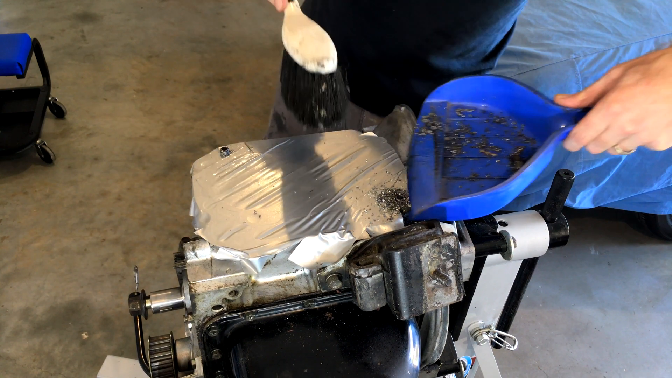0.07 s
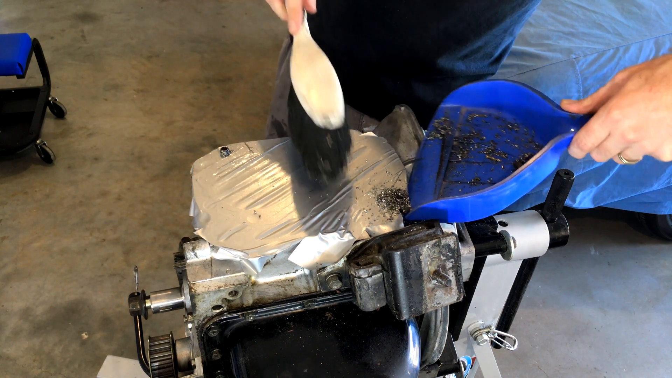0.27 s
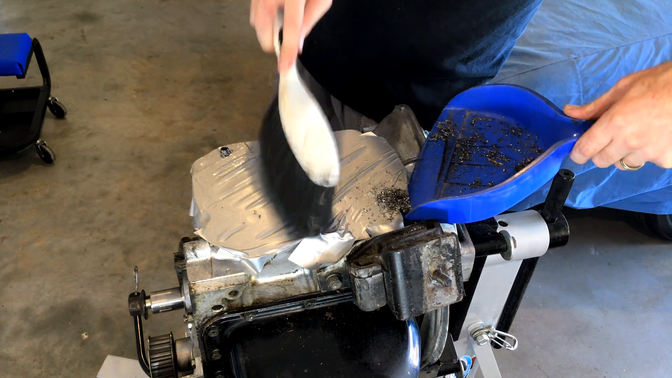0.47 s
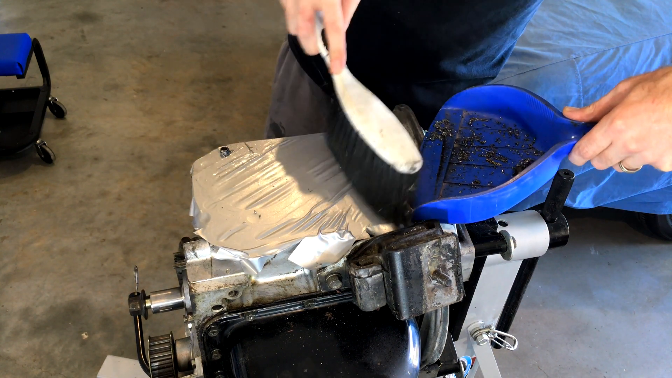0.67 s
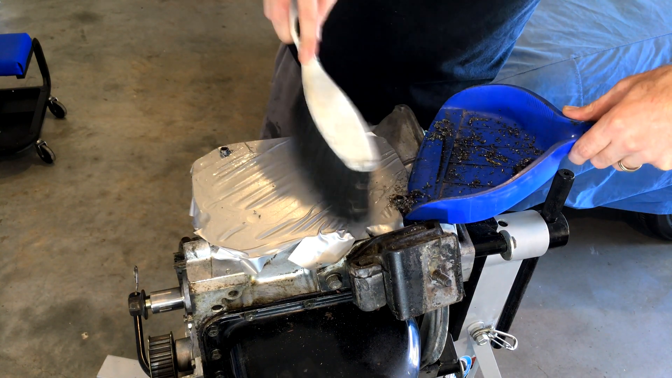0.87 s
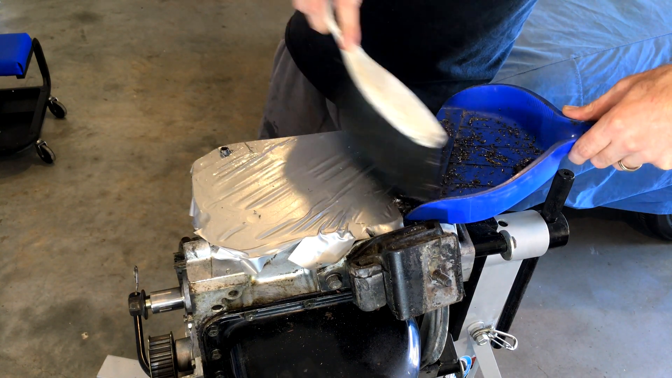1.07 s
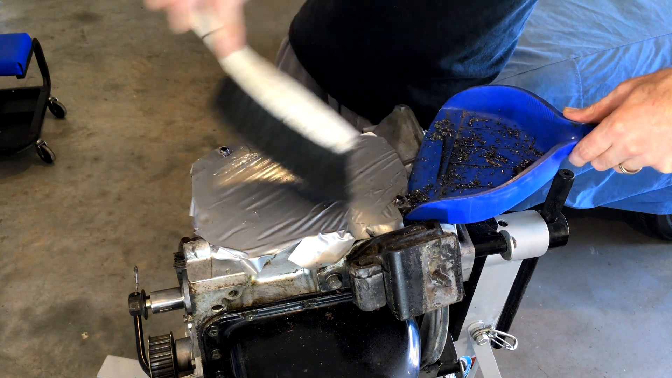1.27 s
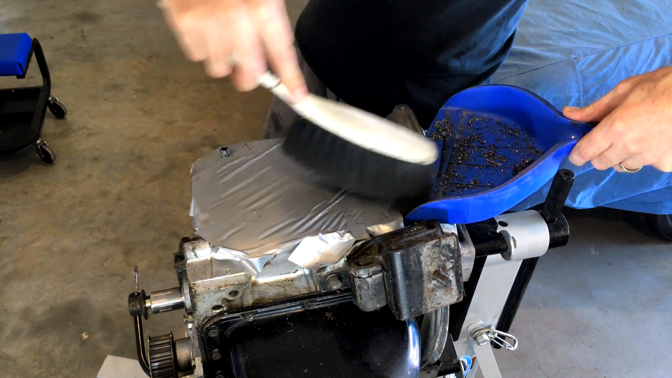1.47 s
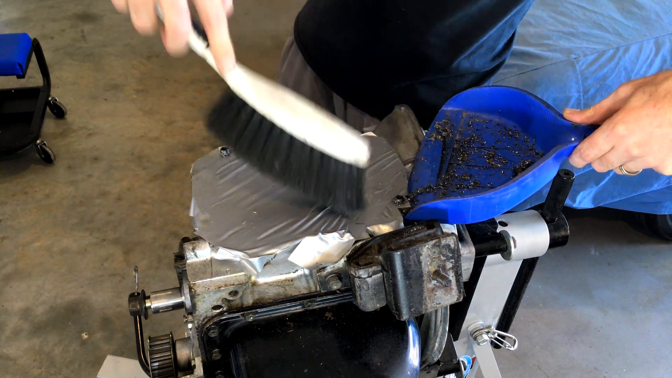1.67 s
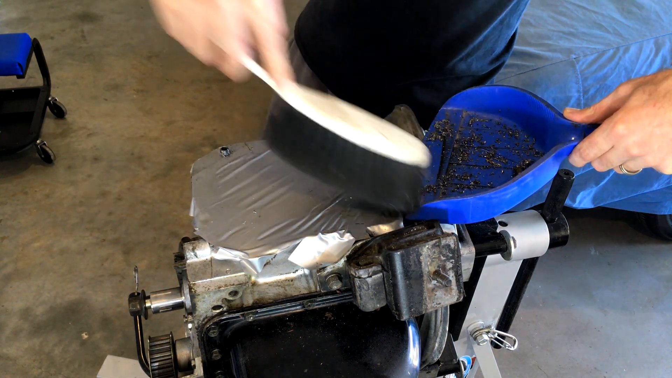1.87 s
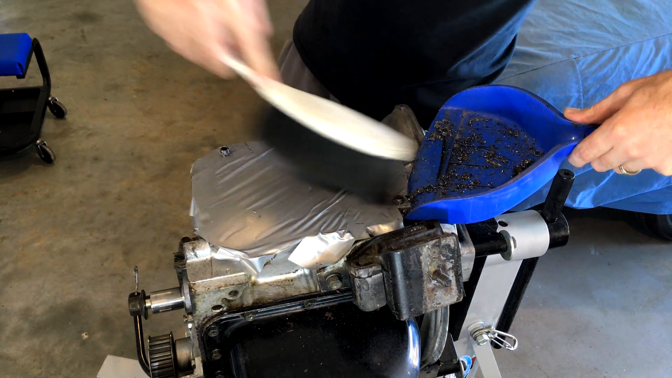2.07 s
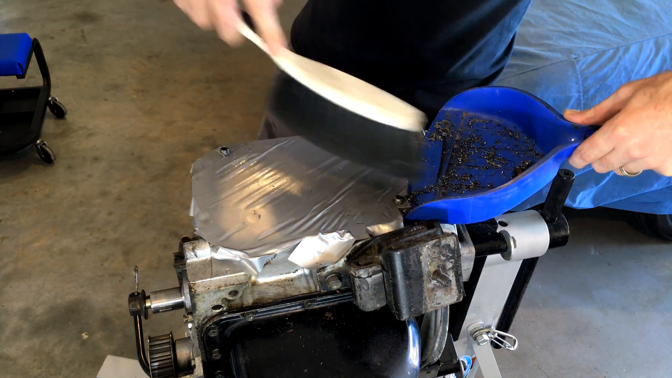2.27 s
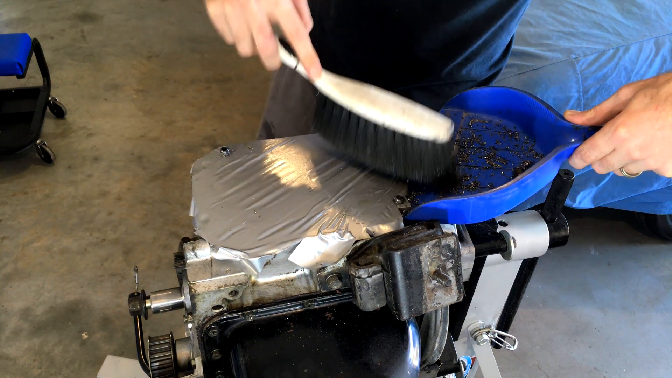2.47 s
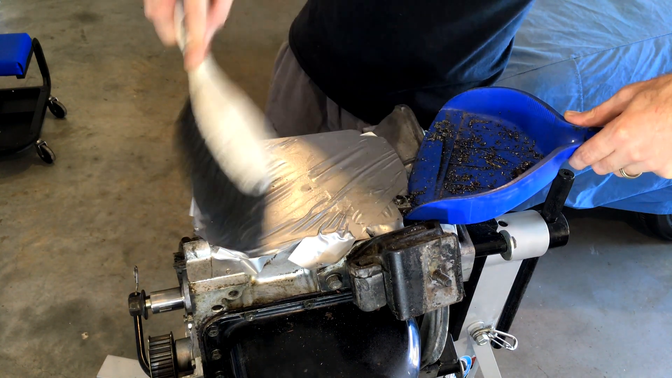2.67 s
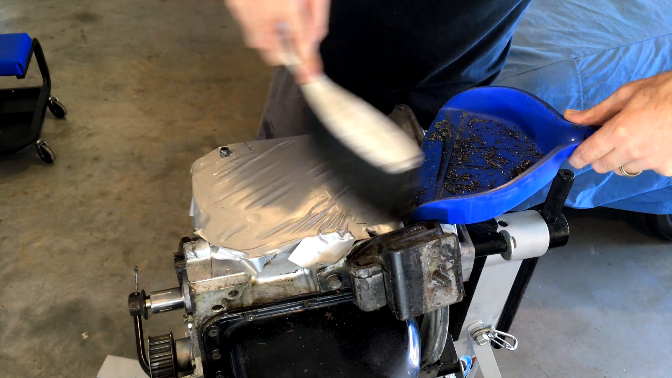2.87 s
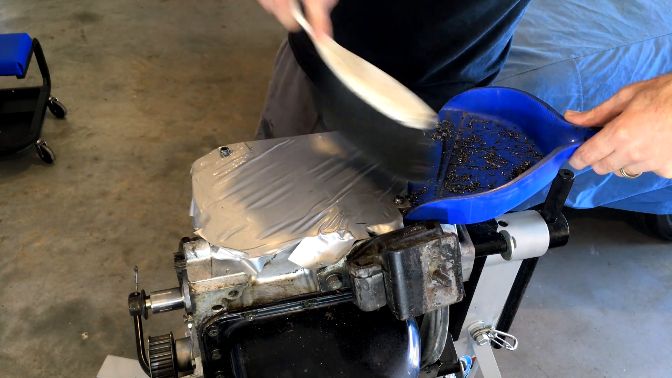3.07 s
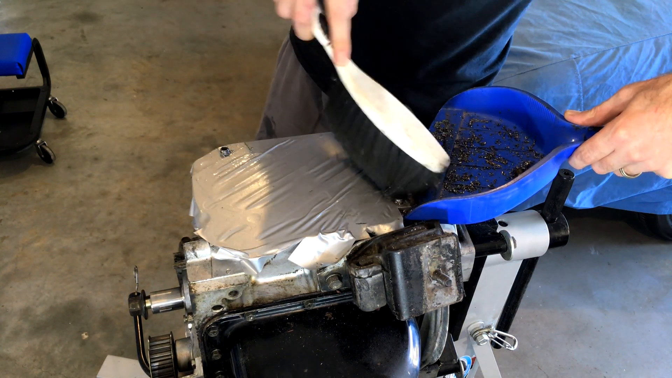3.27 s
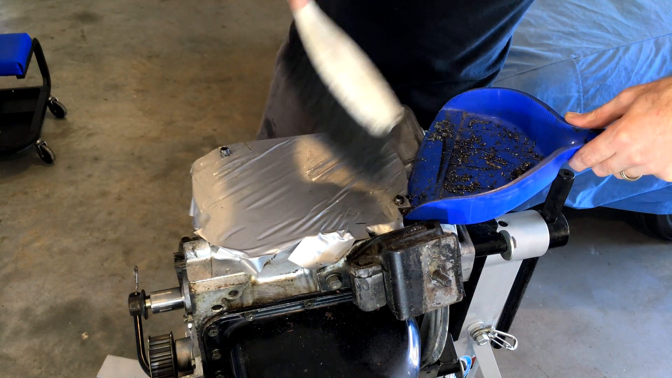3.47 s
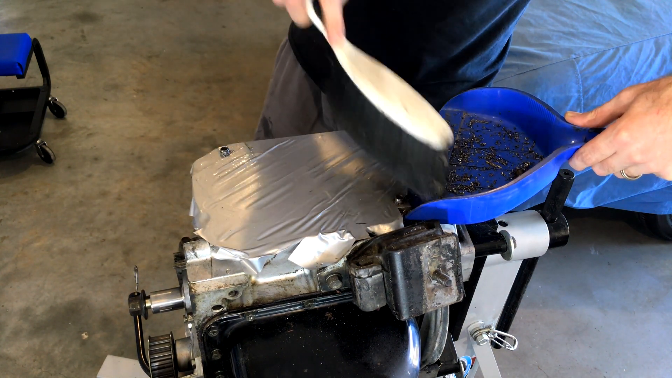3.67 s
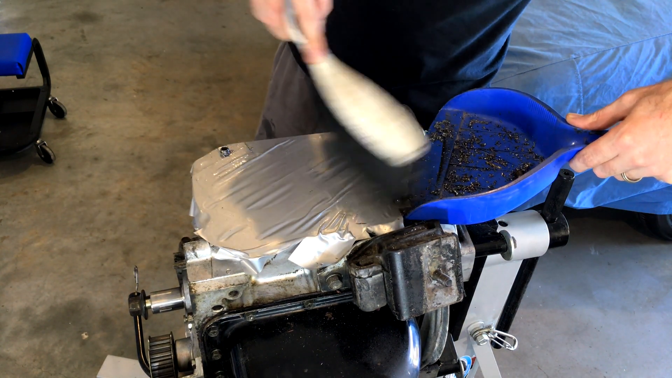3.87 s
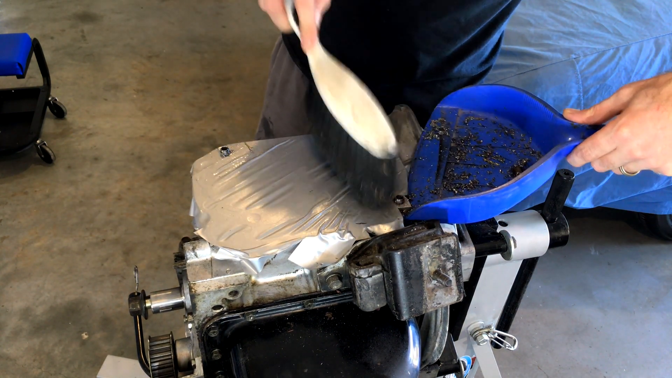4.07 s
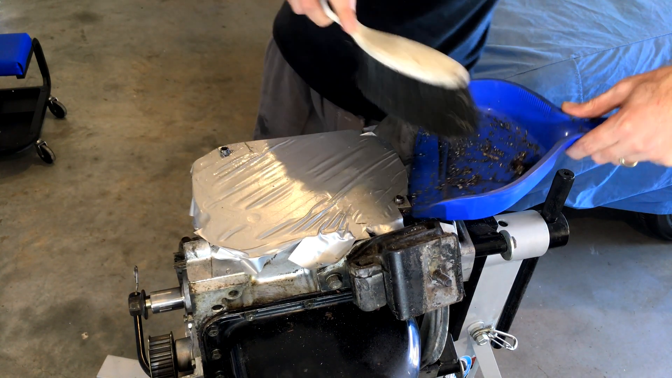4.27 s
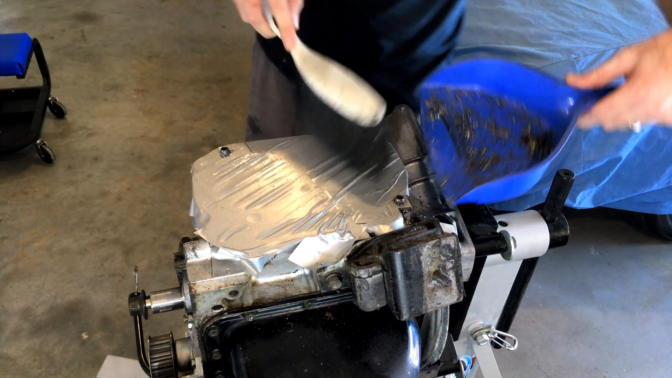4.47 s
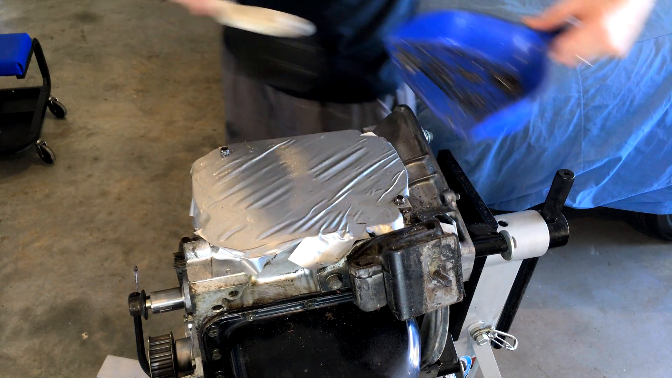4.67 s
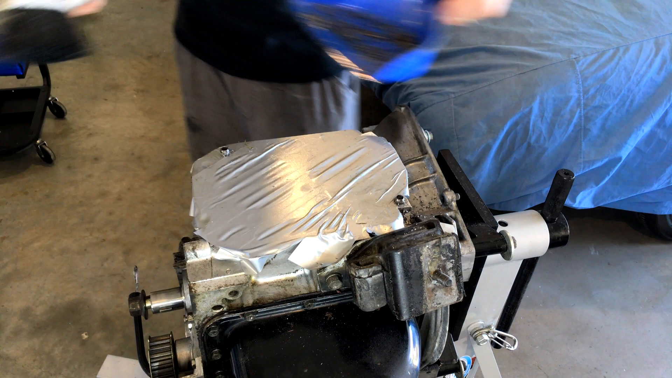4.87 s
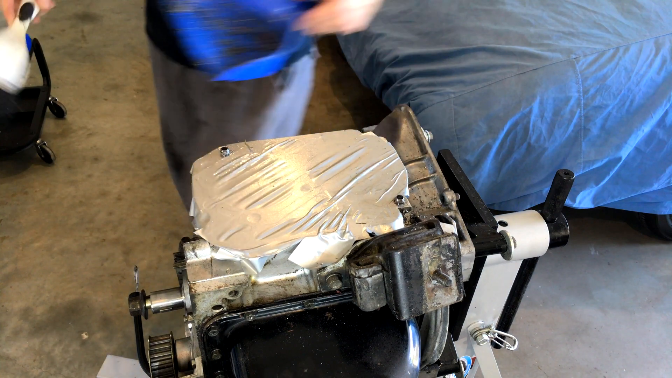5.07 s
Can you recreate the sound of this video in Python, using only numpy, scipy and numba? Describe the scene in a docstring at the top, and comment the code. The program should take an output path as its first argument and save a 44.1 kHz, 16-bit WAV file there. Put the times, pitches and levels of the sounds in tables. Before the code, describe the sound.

A close mono pickup in a garage with faint low air hum and a short, dull room tail. From 0 to 0.4 s a plastic dustpan is pushed into place: uneven dull rubbing, low knocks and two small hollow bumps near 0.1 and 0.17 s. The first brush stroke starts at 0.5 s, followed by others at roughly 0.75, 0.9, 1.3, 1.7, 2.05, 2.4, 2.7, 3.2, 3.55, 3.85, 3.95, 4.1 and 4.45 s. Most land with a soft boxy thud on the hollow taped cover, crackle at once, then rasp dry and scratchy with airy bristle hiss for 0.1 to 0.2 s, thinning to loose grit. Bright tiny metal ticks scatter throughout, stronger near 1.0 and 2.1 s, sharpest at 3.95 s. After 4.5 s brushing stops; quiet rubbing and sliding shavings follow as the pan leaves, with a soft scuff and bump around 5 s.

```python
"""A hand brush sweeps metal shavings off a taped-over engine part into a plastic dustpan in a garage.
Its bristles stick and slip: random clicks, filtered as scratch and tip hiss, also drive the hollow cover's modes.
Landings are soft pushes on those modes; shavings tick as short noise bursts, the pan rubs (coloured clicks)
and knocks dully (fading sines). A small room answers with a noise tail, over a faint hum of air."""
import sys
import numpy as np
from scipy import signal
from scipy.fft import rfft, irfft
from scipy.io import wavfile
from scipy.ndimage import uniform_filter1d
from numba import njit

SR = 44100
rng = np.random.default_rng(int(sys.argv[2]) if len(sys.argv) > 2 else 0)


def wav_out(sig):
    """Save sig, one row per channel (or a flat mono array), as 16-bit PCM at SR to the path in sys.argv[1]."""
    wavfile.write(sys.argv[1], SR, np.round(np.clip(np.atleast_2d(sig).T, -1, 1) * 32767).astype(np.int16))


def gain_from_db(level_db):
    """Turn a decibel level (scalar or array-like) into a linear amplitude factor."""
    decades = np.asarray(level_db, float) / 20
    return 10 ** decades


N = 226268

# garage air and microphone hiss: hz, gain_db
AIR_CURVE = [(12, -67), (20, 6.5), (56, 4.5), (204, -3.5), (388, -8.5), (472, -11.5), (678, -15.5),
             (780, -9.5), (976, -15.5), (1570, -14.5), (2530, -23), (5380, -22), (7110, -24), (14700, -25),
             (16000, -35)]
# pan brought to the edge, carried off, scuffed; per move, points of: start_s, rub_level_db, slide_against_rub_db
PAN_MOVES = [
    [(0, -45, -17.5), (.036, -46, -11), (.114, -46.5, -14.5), (.19, -55, -8), (.27, -59, -9),
     (.47, -70.5, -3.5)],
    [(4.5, -63, -10), (4.55, -63, -12), (4.63, -60.5, -9), (4.71, -60, -4.5), (4.8, -66, -1.5),
     (4.855, -68, 13.5), (4.91, -67, 2.5), (4.95, -77, 0), (5.13, -79, 2)],
    [(4.945, -81, -12), (4.96, -56.5, -10), (5.01, -56, -14), (5.044, -67, -15), (5.07, -64, -9),
     (5.1, -80, -5)],
]
# pan and sleeve rub, first move then the later two: hz, gain_db
RUB_CURVES = [
    [(35, -31), (60, -7), (162, 0.5), (226, -6), (335, 1.5), (512, -11), (822, -7), (1590, -10.5),
     (1870, -19.5), (2220, -8), (2600, -19), (3380, -37), (5720, -120)],
    [(35, -42), (60, -17), (81, -4), (404, -1), (496, -2.5), (639, -5.5), (784, -2.5), (1380, -8.5),
     (2600, -19), (3380, -42), (5720, -120)],
]
# shavings sliding, first move then the later two: hz, gain_db
SLIDE_CURVES = [
    [(1530, -30), (2600, -22), (2940, -0.5), (3190, -6), (4040, -7.5), (5870, -3), (10500, -16.5),
     (14400, -8), (16000, -23)],
    [(1530, -7.5), (2600, -3.5), (3630, -0.5), (4200, -4), (5440, 0.5), (6470, -15), (7090, -14),
     (10900, -16), (16000, -24)],
]
# region each move's rub favours: pitch_hz, lift_db
RUB_FOCUS = [(800, 6), (480, 0), (800, 16)]
# dull knocks of pan and stand: start_s, peak_db, pitch_hz, t60_s
PAN_KNOCKS = [(0.004, -44, 167, 0.058), (0.099, -37.5, 156, 0.051), (0.17, -51, 95.5, 0.11),
              (0.496, -39.5, 72, 0.016), (0.596, -50, 65.7, 0.048), (0.659, -47, 244, 0.023),
              (3.971, -45.5, 104, 0.094), (4.018, -49, 148, 0.13), (4.206, -49, 124, 0.048),
              (4.454, -40.5, 95, 0.035), (4.899, -56, 61.9, 0.06)]
# shavings striking cover or pan: start_s, peak_db, ring_hz, clack_against_ring_db, edge_against_ring_db
CHIP_TICKS = [(0.7485, -40, 4670, -16, -15), (0.772, -44, 4600, -10, -8), (0.7956, -37, 4050, -3, -16),
              (0.828, -42, 4400, -8, -4), (0.8652, -39.5, 5060, -26, -24), (0.9963, -31, 3840, -4, -4),
              (1.127, -53, 4100, -6, -20), (1.2806, -50, 5180, -19, 3), (1.3034, -49, 5470, -15, -7),
              (1.5758, -46.5, 4210, -19, 2), (1.614, -48, 3230, -1, -15), (2.1216, -30, 4030, -18, -22),
              (2.2052, -40, 3600, -3, -16), (2.259, -41.5, 3230, 4, 0), (2.461, -40.5, 3950, -17, -22),
              (2.54, -41.5, 4600, 8, -21), (2.577, -47.5, 3670, -2, -8), (2.614, -46, 2900, 2, -2),
              (2.655, -41, 4130, 1.5, -2), (3.173, -42, 3240, -8, -14), (3.4056, -37, 4540, -2, 3.5),
              (3.4506, -42.5, 3830, 10, -15), (3.9491, -23, 4270, -2.5, -2), (3.96, -52, 5460, -25, -10),
              (3.9777, -28, 5060, -2.5, -18), (3.9874, -49, 5480, -20, -16),  (4.2064, -43, 4400, 9, -25),
              (4.359, -42.5, 2700, 31, -29), (4.7127, -49, 4590, 5, -22), (4.757, -45, 4670, -22, -26),
              (5.004, -45, 5200, -11, -20), (5.017, -49, 4470, 4, -24)]
# modes of the hollow taped cover: pitch_hz, relative_level_db, t60_s
COVER_MODES = [(271, -33, 0.048), (339, -3, 0.24), (413, -8.5, 0.041), (489.7, -4.5, 0.11), (528, -7, 0.08),
               (622, -2.5, 0.027), (689, 0, 0.018), (809, 2.5, 0.033), (930, -1, 0.028), (1174, -3, 0.014),
               (1340, -6, 0.023), (1491, -2, 0.0085), (1584, -2, 0.0095), (1830, -17.5, 0.011),
               (2060, -11.5, 0.066), (2220, -18.5, 0.23), (2400, -19, 0.033)]
# brush or pan lip bumping the cover: start_s, peak_db, favoured_hz, push_ms
COVER_LANDINGS = [(0.097, -36, 813, 0.36), (0.17, -33.5, 1020, 0.12), (0.492, -52, 633, 0.61),
                  (0.881, -28.5, 650, 0.3), (0.936, -34, 610, 0.78), (1.332, -38, 673, 1),
                  (1.471, -61, 622, 0.66), (1.74, -33.5, 630, 1), (2.048, -33, 845, 0.65),
                  (2.073, -50, 608, 0.68), (2.369, -42, 608, 1), (2.72, -35, 640, 0.45),
                  (2.854, -48, 724, 0.83), (3.193, -34.5, 630, 0.47), (3.22, -41.5, 490, 0.29),
                  (3.552, -44, 630, 0.39), (3.844, -31.5, 1000, 0.35), (4.108, -29.5, 590, 0.82),
                  (4.454, -27.5, 720, 0.47), (4.96, -57, 797, 0.27), (5.003, -44, 780, 0.56)]
# brush from each landing until its last chips settle; per stroke, points of:
# start_s, sweep_level_db, weight_against_sweep_db
BRUSH_STROKES = [
    [(.494, -45, 16), (.512, -54.5, 9), (.575, -51, 2), (.666, -51, 8.5), (.708, -58.5, 6),
     (.738, -59, -14)],
    [(.748, -48, -21), (.813, -62.5, 6.5), (.866, -56, -24)],
    [(.884, -50, 21), (.9, -58, 12.5), (.922, -52.5, 5), (.964, -54, 14.5), (.99, -56, -2),
     (1.062, -63.5, -4), (1.222, -80.5, 9), (1.31, -65.5, 12.5)],
    [(1.334, -47, 4), (1.355, -54, 7), (1.4, -51, 10), (1.453, -50, 10), (1.489, -57, 19),
     (1.51, -60.5, -6), (1.69, -79, 5)],
    [(1.71, -47, -6), (1.74, -53.5, 2), (1.782, -53.5, -8), (1.834, -68, 18.5), (1.864, -59, 2),
     (1.952, -87, -11), (2.03, -93, 0)],
    [(2.049, -50.5, 10), (2.093, -50.5, 14.5), (2.143, -48.5, -8.5), (2.221, -66, 3), (2.291, -69, -2),
     (2.35, -85, -2)],
    [(2.37, -43.5, 5), (2.385, -53, 16), (2.415, -48, -0.5), (2.46, -58, -2), (2.522, -69.5, -2),
     (2.66, -71, 3), (2.70, -93, 12)],
    [(2.72, -42.5, 9), (2.745, -49, 0), (2.817, -44.5, -1), (2.869, -49.5, 2.5), (2.935, -50.5, 4.5),
     (3.033, -89, -13), (3.16, -78.5, 14)],
    [(3.19, -52, 12.5), (3.233, -50, 9.5), (3.252, -48, -30), (3.319, -63.5, -2), (3.385, -67.5, -15),
     (3.402, -63, -2.5), (3.53, -79, -18)],
    [(3.553, -56, 11), (3.57, -55.5, 10.5), (3.607, -52, -9.5), (3.665, -67.5, 2), (3.795, -99, -14)],
    [(3.846, -46.5, 5.5), (3.856, -55, 16), (3.881, -54, 3.5), (3.938, -74.5, 1)],
    [(3.951, -49, -13), (4.011, -65.5, 8.5), (4.037, -67.5, 2), (4.05, -80, -4), (4.09, -90, 3)],
    [(4.105, -50, 9), (4.135, -54.5, 9), (4.181, -75.5, -3), (4.213, -68, 11.5), (4.251, -98, 12),
     (4.43, -112, 10)],
    [(4.452, -43.5, 11), (4.47, -60, 10), (4.5, -68, -5), (4.53, -83, 8)],
]
# how each stroke meets the tape: cover_hz, scratch_hz, hiss_hz, crinkle_against_sweep_db, hiss_against_sweep_db
TAPE_CONTACTS = [(653, 3670, 9900, 4, -6), (660, 4000, 11600, 3.5, -1.5), (607, 3740, 11600, 4.5, -5.5),
                 (650, 3650, 10300, 1, -5), (534, 3560, 8500, 0.5, -4), (678, 3740, 8300, 0.5, -5.5),
                 (670, 3650, 9200, -0.5, -8), (660, 4260, 10300, -1, -6.5), (600, 3300, 10700, 2.5, -6),
                 (640, 3760, 10400, 2.5, -5), (706, 3900, 10200, 6.5, -5), (720, 3700, 9700, -1.5, 0.5),
                 (650, 3650, 8700, 3.5, -7), (780, 4000, 9100, 1, -12)]
# bristles on the tape: hz, gain_db
SCRATCH_CURVE = [(1410, -22), (2400, -2), (2620, -14), (2740, -0.5), (3300, 1), (4630, -2.5), (5030, -1.5),
                 (5450, -3.5), (6850, -14.5), (7500, -10.5), (9750, -25), (16500, -120)]
# bristle tips: hz, gain_db
TIP_CURVE = [(3530, -31), (6000, -4), (7070, -21), (7830, -6), (9190, -7.5), (11600, -9), (12800, -8.5),
             (14400, -6), (16000, -9.5)]

SILENT_DB, AIR_DB = -130, -63.5
ROOM_T60_S, ROOM_DB, ROOM_TOP_HZ = 0.35, -18, 5100
COVER_LOW_HZ, CRINKLE_FROM_HZ, PAN_HZ = 320, 1050, 1465
FIRM_DB = -48  # sweep level above which the bristles press fully
ATTACK_S, ATTACK_DB = 0.0031, -19  # touchdown, ahead of and against each stroke's first point
CRINKLE_DB_PER_WEIGHT_DB, HISS_DB_PER_LIFT_DB = 0.24, 0.11
# as the brush lifts, per dB under firm: favoured cover pitch sags, unbent bristles sound brighter
COVER_SAG_PER_DB, SCRATCH_RISE_PER_DB, HISS_RISE_PER_DB = 0.0063, 0.015, 0.0044
HISS_WANDER = 0.11  # fraction of pitch, as bristles bend unevenly
# at touchdown the tape crackles at once, the tips hiss a moment late
SLAP_DB, SLAP_S, TIPS_LATE_DB, TIPS_LATE_S = 7.5, 0.0027, -1.5, 0.021


def unit(x):
    """Scale to rms 1."""
    return x / np.sqrt(np.mean(x ** 2))


def butter_filter(x, order, hz, kind):
    """Butterworth filter."""
    return signal.sosfilt(signal.butter(order, hz, kind, fs=SR, output="sos"), x)


def colour(x, points):
    """Causal filter with the gain of (hz, gain_db) points, from the folded cepstrum."""
    hz, gain_db = np.transpose(points)
    grid_hz = np.maximum(np.fft.rfftfreq(8192, 1 / SR), 1)
    log_gain = np.interp(np.log(grid_hz), np.log(hz), gain_db) * np.log(10) / 20
    cepstrum = irfft(log_gain)
    cepstrum[1:4096] *= 2
    cepstrum[4097:] = 0
    impulse = irfft(np.exp(rfft(cepstrum)))[:4096]
    return signal.fftconvolve(x, impulse)[:N]


@njit
def moving_band(x, hz, sharp):
    """State-variable band-pass whose centre moves every sample, gain 1 at the centre."""
    y, band, low, damping = np.empty(len(x)), 0., 0., 1 / sharp
    for i in range(len(x)):
        g = np.tan(np.pi * hz[i] / SR)
        v = (band + g * (x[i] - low)) / (1 + g * (g + damping))
        band = 2 * v - band
        low = low + 2 * g * v
        y[i] = damping * v
    return y


def favour(x, hz, sharp, lift_db):
    """Lift one moving region of the spectrum above the rest."""
    return unit(x + gain_from_db(lift_db) * moving_band(x, hz, sharp))


def fading_sine(hz, t60_s, length_s):
    """One mode: a sine that falls 60 dB in t60_s."""
    t = np.arange(int(length_s * SR)) / SR
    return np.sin(2 * np.pi * hz * t) * 1000. ** (-t / t60_s)


def add(track, start_s, x, peak_db):
    """Lay a short sound into the track with the given peak."""
    i = int(start_s * SR)
    x = x[:N - i]
    track[i:i + len(x)] += x * gain_from_db(peak_db) / np.max(np.abs(x))


def walk(rate_hz):
    """Random levels, one per 1 / rate_hz, slewed; rms 1."""
    hold = int(SR / rate_hz)
    steps = np.repeat(rng.standard_normal(N // hold + 1), hold)
    return unit(uniform_filter1d(steps, hold)[:N])


def slips(spread_db, judder_hz, judder_db):
    """Bristles or surfaces letting go: dense clicks, a few far larger, in uneven bunches."""
    size_db = spread_db * rng.exponential(size=N) + judder_db * walk(judder_hz)
    return rng.standard_normal(N) * gain_from_db(size_db)


def patter(rate_hz, spread_db, burst_s):
    """Loose chips flicked about: scattered short noise bursts of uneven size."""
    starts = (rng.random(N) < rate_hz / SR) * gain_from_db(spread_db * rng.standard_normal(N))
    envelope = signal.lfilter([1], [1, -np.exp(-1 / (burst_s * SR))], starts)
    return unit(envelope * rng.standard_normal(N))


def air():
    """Quiet garage air and microphone hiss: coloured noise, drifting slightly."""
    return unit(colour(rng.standard_normal(N), AIR_CURVE)) * gain_from_db(AIR_DB + 1.2 * walk(1.98))


def room(x):
    """Short dull tail from the walls: low-passed decaying noise."""
    t = np.arange(int(.5 * SR)) / SR
    tail = rng.standard_normal(len(t)) * 1000. ** (-t / ROOM_T60_S)
    tail = tail * (t > .006)  # first reflection
    tail = signal.lfilter(*signal.butter(1, ROOM_TOP_HZ, fs=SR), tail)
    return gain_from_db(ROOM_DB) * signal.fftconvolve(x, tail / np.sqrt(np.sum(tail ** 2)))[:N]


def rustle():
    """Pan and sleeve shift: uneven dull rub by friction, loose shavings sliding with a thin hiss."""
    t, out = np.arange(N) / SR, np.zeros(N)
    # the last move reuses the second move's curves
    rub_curves = RUB_CURVES + RUB_CURVES[-1:]
    slide_curves = SLIDE_CURVES + SLIDE_CURVES[-1:]
    for move, (focus_hz, focus_db), rub_curve, slide_curve in zip(PAN_MOVES, RUB_FOCUS, rub_curves, slide_curves):
        s, rub_db, slide_db = np.transpose(move)
        rub = favour(colour(slips(2.27, 45, 1.9), rub_curve), np.full(N, 1. * focus_hz), 4.0, focus_db)
        slide = unit(colour(slips(2.2, 45, 1.2), slide_curve))
        for grain, level_db in ((rub, rub_db), (slide, rub_db + slide_db)):
            out += grain * gain_from_db(np.interp(t, s, level_db, left=SILENT_DB, right=SILENT_DB))
    return out


def knocks():
    """Pan and stand thuds: low, quickly damped sines."""
    out = np.zeros(N)
    for start_s, peak_db, pitch_hz, t60_s in PAN_KNOCKS:
        add(out, start_s, fading_sine(pitch_hz, t60_s, .3), peak_db)
    return out


def shavings():
    """Each chip lands as a burst of about a millisecond: bright ring, thin edge and the pan's clack."""
    out = np.zeros(N)
    fade = np.exp(-np.arange(600) / SR / 0.0012)
    for start_s, peak_db, ring_hz, clack_db, edge_db in CHIP_TICKS:
        burst = fade * rng.standard_normal(600)
        chip = unit(butter_filter(burst, 2, [ring_hz / 1.22, ring_hz * 1.08], "band"))
        clack = unit(butter_filter(burst, 2, [PAN_HZ / 1.32, PAN_HZ * 1.29], "band"))
        edge = unit(butter_filter(burst, 3, 6500, "high"))
        add(out, start_s, chip + gain_from_db(clack_db) * clack + gain_from_db(edge_db) * edge, peak_db)
    return out


def hand():
    """Brush levels and pitches over time, all following sweep and weight."""
    rows = []
    for stroke, contact in zip(BRUSH_STROKES, TAPE_CONTACTS):
        s, sweep_db, weight_db = stroke[0]
        touchdown = (s - ATTACK_S, sweep_db + ATTACK_DB, weight_db)
        rows += [(*point, *contact) for point in [touchdown, *stroke]]
    s, *columns = np.transpose(rows)
    t = np.arange(N) / SR
    point_s = np.maximum.accumulate(s)
    sweep_db, weight_db, drum_hz, scratch_hz, hiss_hz, crinkle_db, hiss_db = (
        np.interp(t, point_s, column) for column in columns)
    lift_db = np.clip(FIRM_DB - sweep_db, 0, 25)

    starts = np.array([stroke[0][0] for stroke in BRUSH_STROKES]) - ATTACK_S
    since_s = np.abs(t - starts[np.maximum(np.searchsorted(starts, t) - 1, 0)])
    crinkle_db = crinkle_db + SLAP_DB * np.exp(-since_s / SLAP_S)
    hiss_db = hiss_db + TIPS_LATE_DB * np.exp(-since_s / TIPS_LATE_S)
    # silent before the first stroke and after the last
    sweep_db = sweep_db + np.where((t >= s[0]) & (t <= s[-1]), 0, SILENT_DB)

    drum_hz = drum_hz * (1 - COVER_SAG_PER_DB * lift_db)
    scratch_hz = scratch_hz * (1 + SCRATCH_RISE_PER_DB * lift_db)
    hiss_hz = hiss_hz * np.clip(1 + HISS_RISE_PER_DB * lift_db + HISS_WANDER * walk(12), .6, 1.45)
    crinkle_db = sweep_db + crinkle_db + CRINKLE_DB_PER_WEIGHT_DB * weight_db
    hiss_db = sweep_db + hiss_db + HISS_DB_PER_LIFT_DB * lift_db
    on_cover = (sweep_db + weight_db, drum_hz, crinkle_db)
    on_tape = (sweep_db, scratch_hz, hiss_db, hiss_hz)
    return on_cover, on_tape


def cover(drum_db, drum_hz, crinkle_db):
    """Slips drive the cover's modes; each landing is one soft push favouring the modes near its pitch."""
    modes = np.array([gain_from_db(level_db) * fading_sine(hz, t60_s, 0.16) / np.sqrt(t60_s)
                      for hz, level_db, t60_s in COVER_MODES])
    modes = butter_filter(modes, 2, COVER_LOW_HZ, "high")  # a small sheet radiates little bass
    mode_hz = np.array(COVER_MODES)[:, 0]
    sheet = modes[mode_hz < CRINKLE_FROM_HZ].sum(axis=0)
    folds = modes[mode_hz >= CRINKLE_FROM_HZ].sum(axis=0)
    folds = butter_filter(folds, 2, 700, "high")

    # heavy pressure drums the sheet where the brush is, light bristles rattle the small folds of tape
    force = unit(slips(2.43, 110, 2.54))
    drum_force = favour(force, drum_hz, 2.32, 29.0)
    out = np.zeros(N)
    for drive, body, level_db in ((drum_force, sheet, drum_db), (force, folds, crinkle_db)):
        steady = np.std(signal.fftconvolve(drive, body))
        out += signal.fftconvolve(drive * gain_from_db(level_db), body)[:N] / steady

    for start_s, peak_db, favoured_hz, push_ms in COVER_LANDINGS:
        push = np.hanning(max(int(push_ms * SR / 1000), 3) + 2)
        mode_gain = gain_from_db(-9.0 * np.abs(np.log2(mode_hz / favoured_hz)))  # -9 dB per octave away
        add(out, start_s, np.convolve(mode_gain @ modes, push), peak_db)
    return out


def bristles(scratch_db, scratch_hz, hiss_db, hiss_hz):
    """One stream of slips makes tape scratch and tip hiss, both pitched by the bend of the bristles."""
    # firm: dense rasp; lifting: single chips stand out
    loose = np.clip((FIRM_DB - scratch_db) / 29.0, .12, .75)
    rasp = unit(slips(2.17, 55, 0.64))
    drag = np.sqrt(1 - loose) * rasp + np.sqrt(loose) * patter(170, 4.3, 0.0012)
    scratch = unit(colour(favour(drag, scratch_hz, 2.3, 4.6), SCRATCH_CURVE))
    hiss = unit(colour(favour(drag, hiss_hz, 2.2, 2.5), TIP_CURVE))
    return scratch * gain_from_db(scratch_db) + hiss * gain_from_db(hiss_db)


def scene():
    """Brush, chips, knocks and handling close by, their echo, and the air."""
    on_cover, on_tape = hand()
    near = cover(*on_cover) + bristles(*on_tape) + shavings() + knocks() + rustle()
    return (near + room(near) + air())[None]


def top_cut(x):
    """Nothing passes above the cut-off."""
    return signal.sosfilt(signal.butter(12, 16720, fs=SR, output="sos"), x)


def record(dry):
    """Steep low-pass cuts the extreme treble."""
    low_pass = signal.ellip(10, .2, 60, 15900, fs=SR, output="sos")  # ripple dB, stop dB, corner Hz
    mix = signal.sosfilt(low_pass, dry)
    return top_cut(mix)


dry = scene()
out = record(dry)
wav_out(out)
```